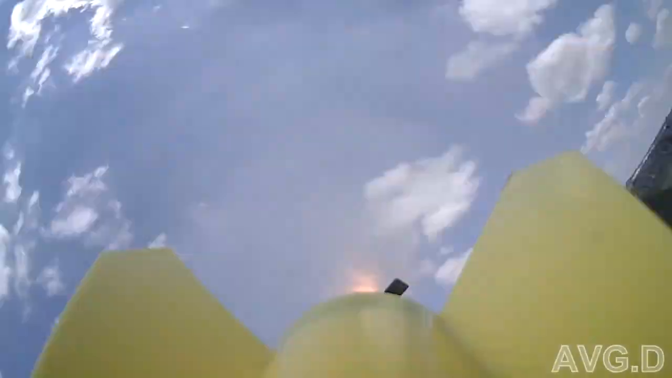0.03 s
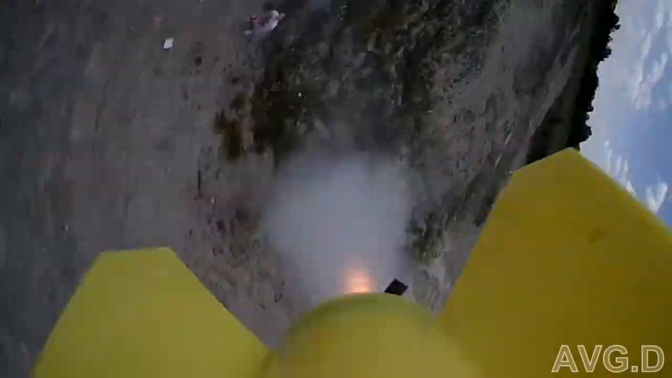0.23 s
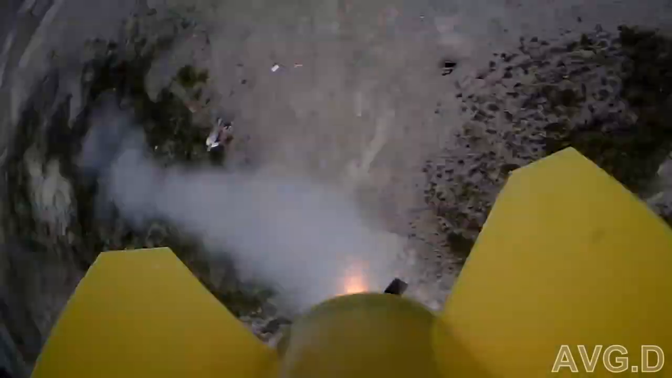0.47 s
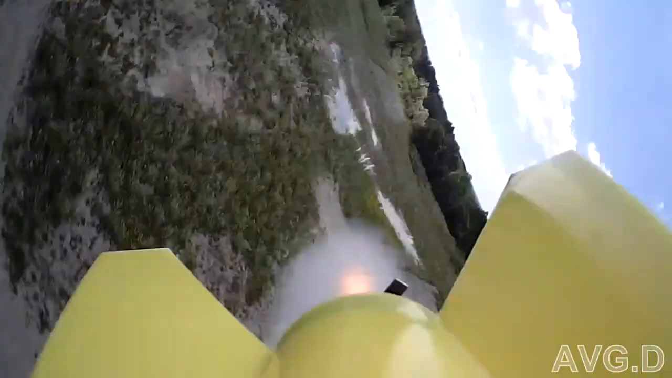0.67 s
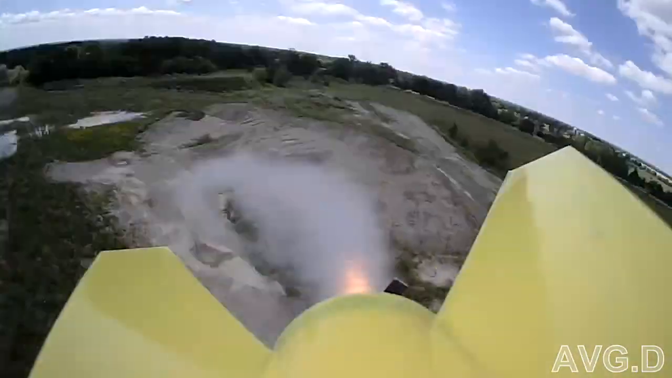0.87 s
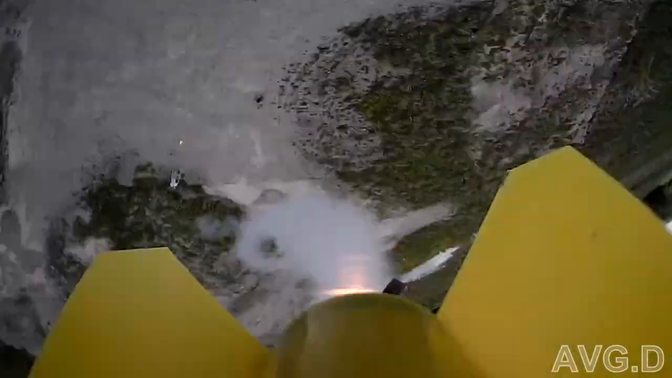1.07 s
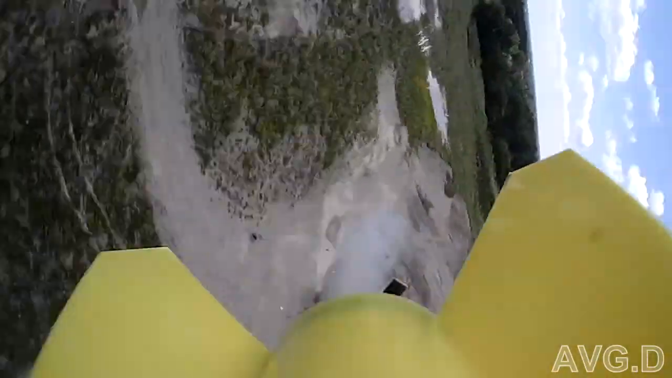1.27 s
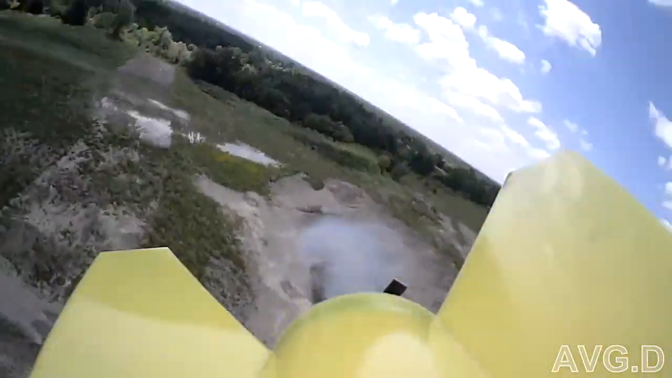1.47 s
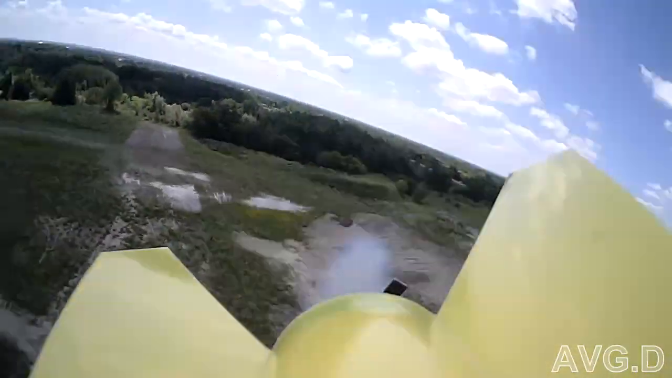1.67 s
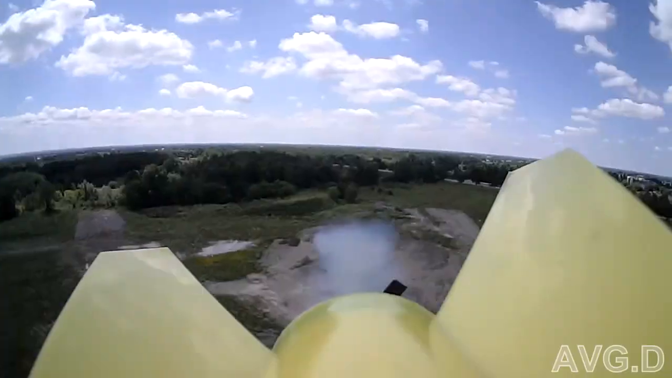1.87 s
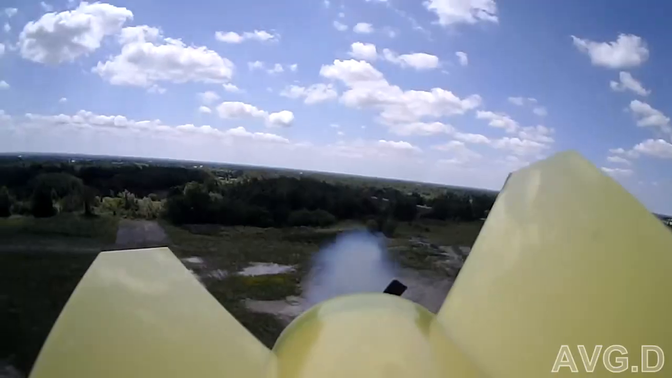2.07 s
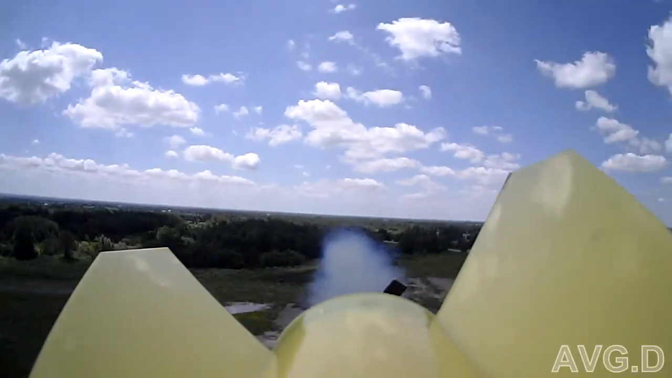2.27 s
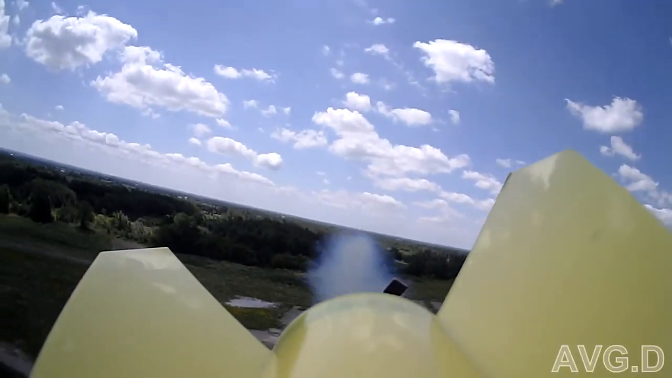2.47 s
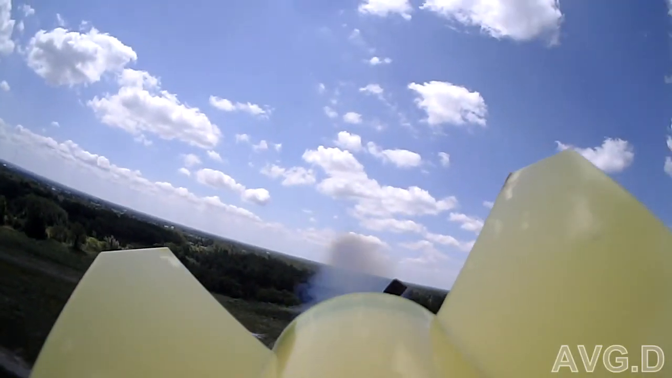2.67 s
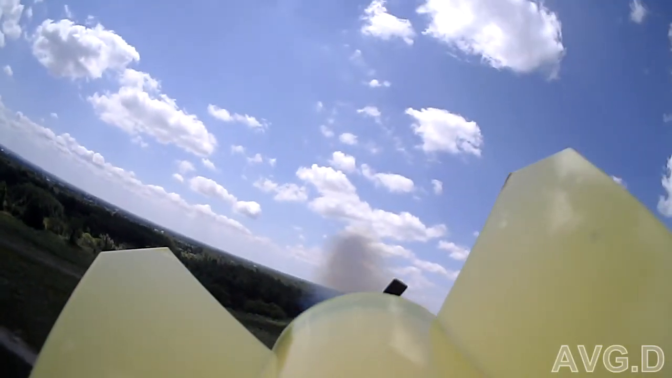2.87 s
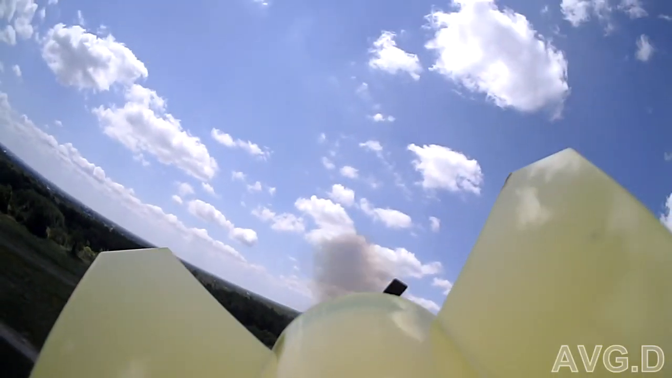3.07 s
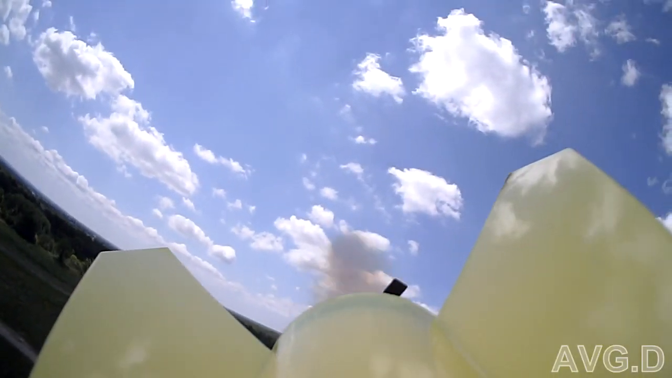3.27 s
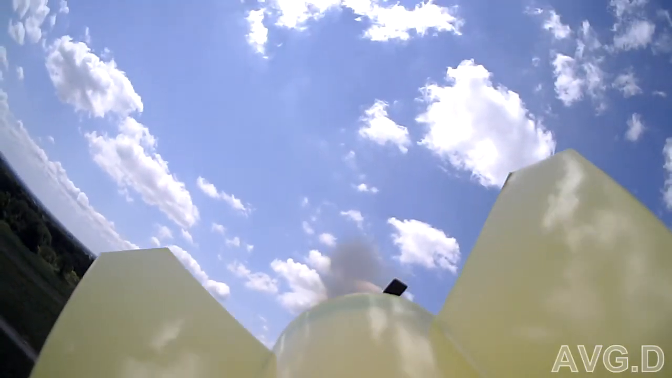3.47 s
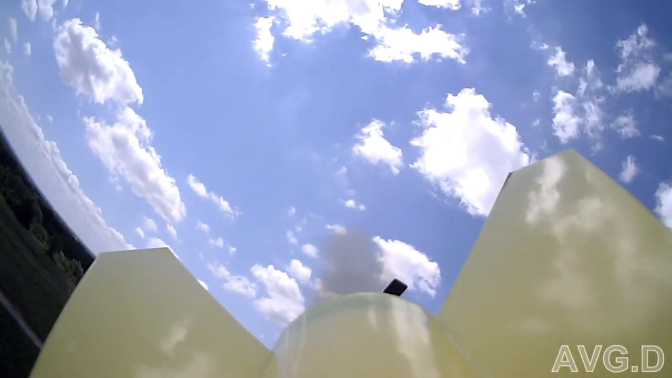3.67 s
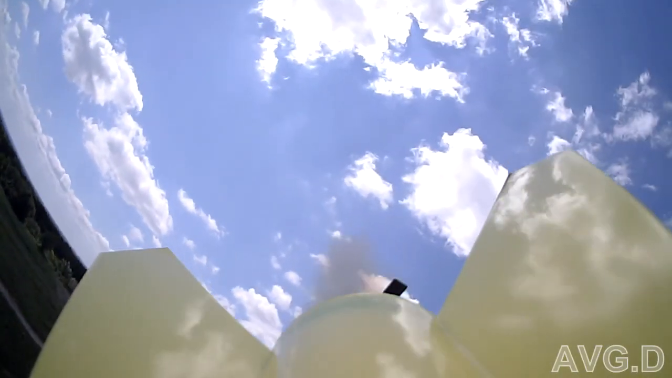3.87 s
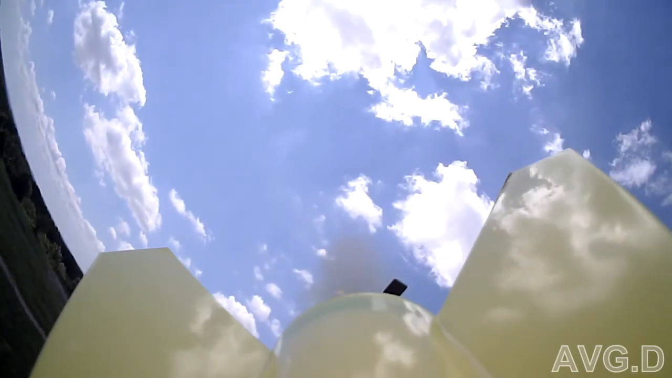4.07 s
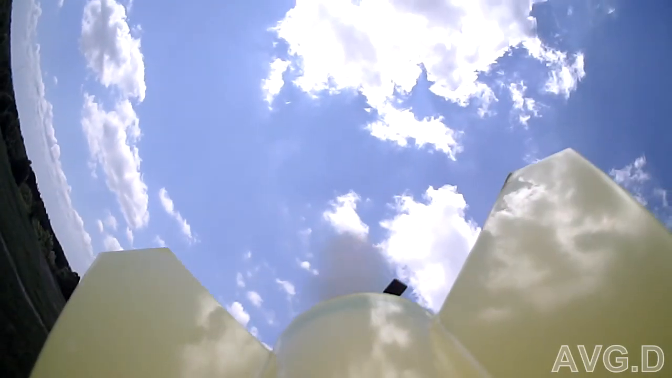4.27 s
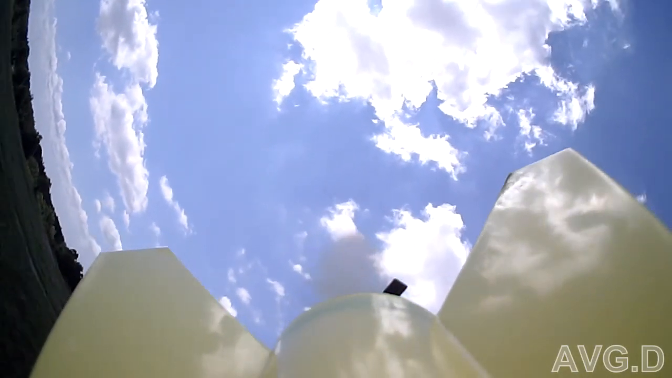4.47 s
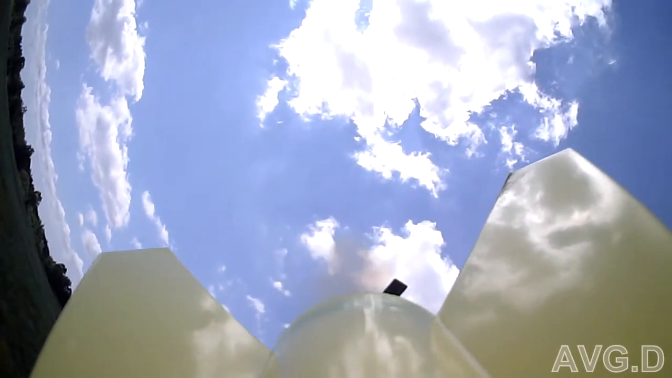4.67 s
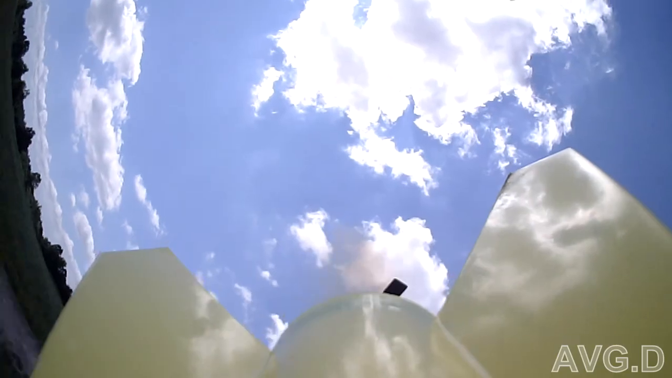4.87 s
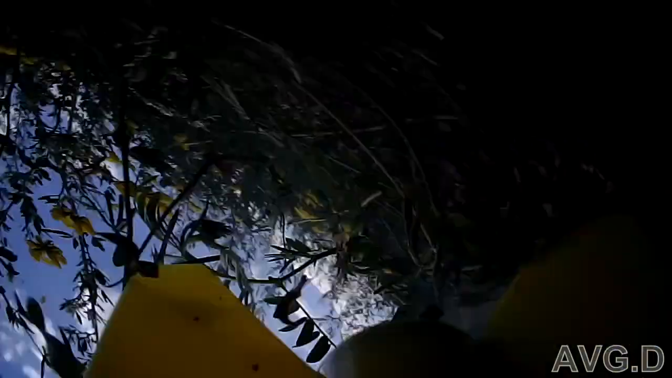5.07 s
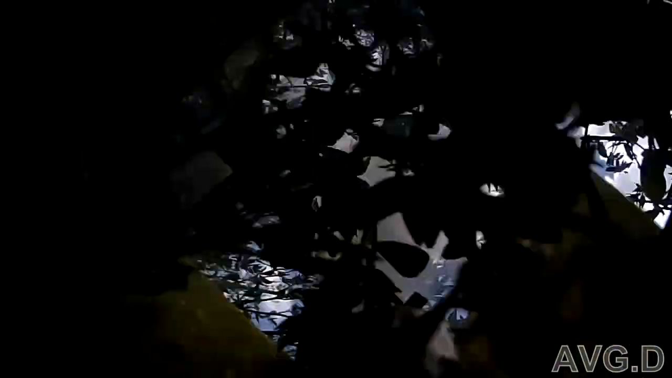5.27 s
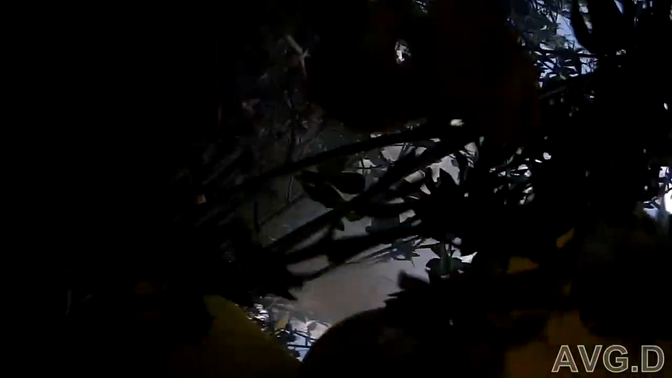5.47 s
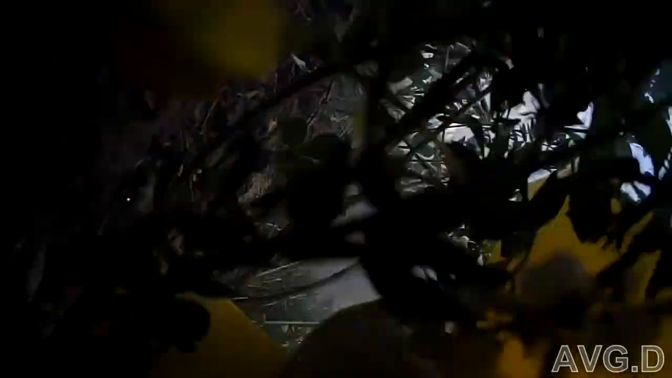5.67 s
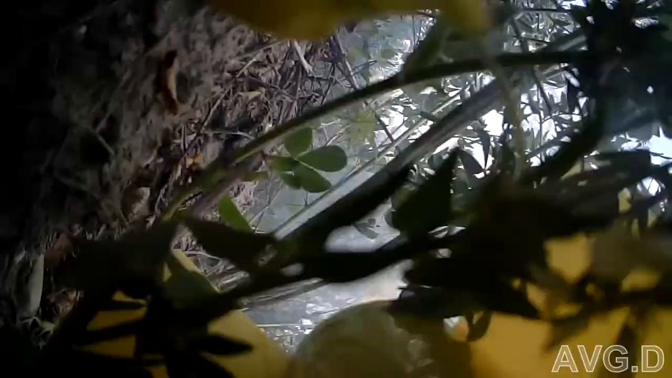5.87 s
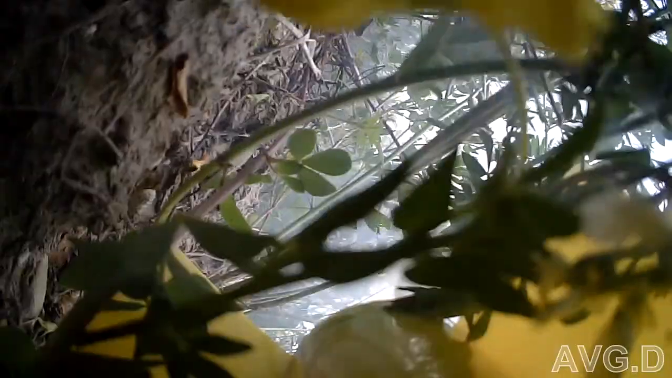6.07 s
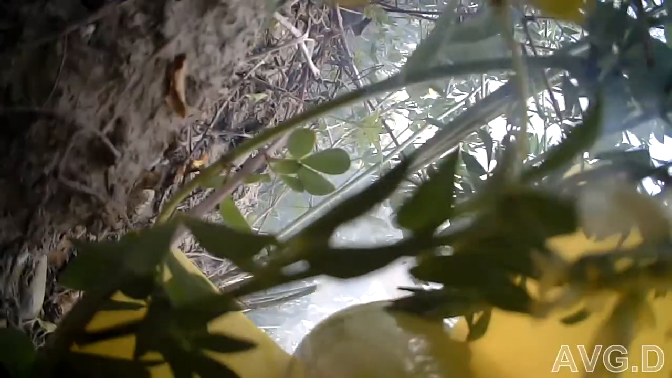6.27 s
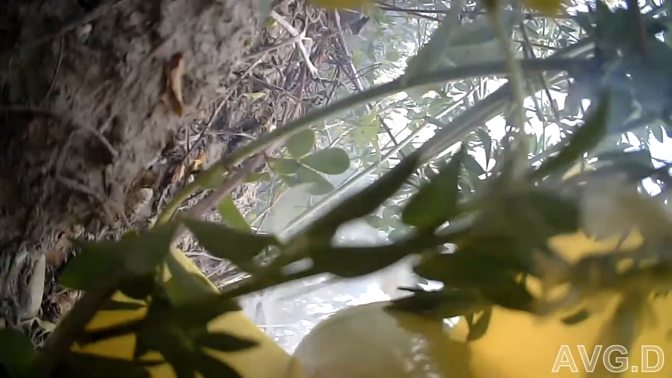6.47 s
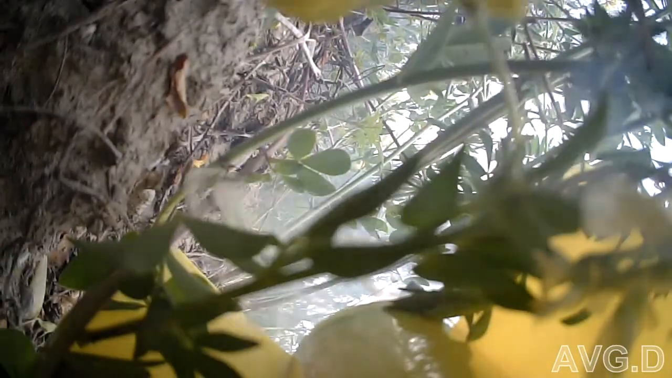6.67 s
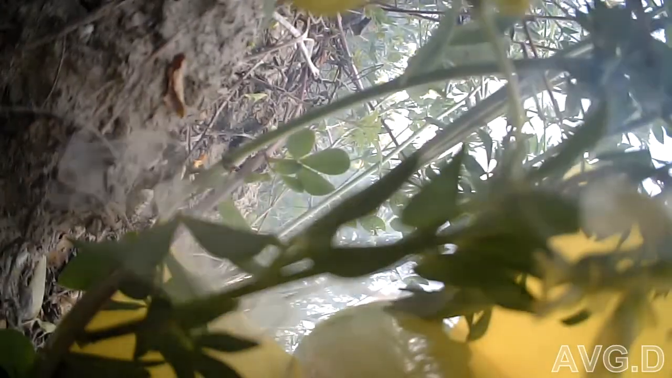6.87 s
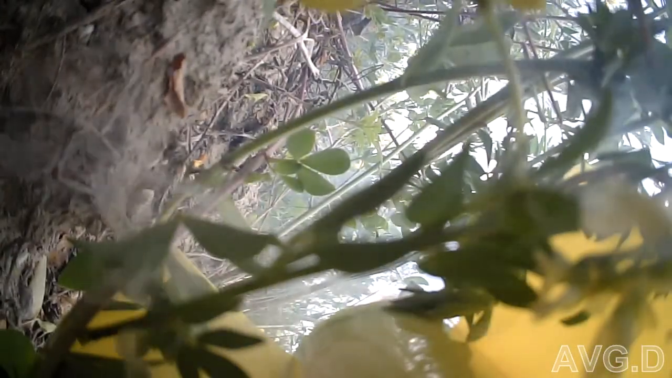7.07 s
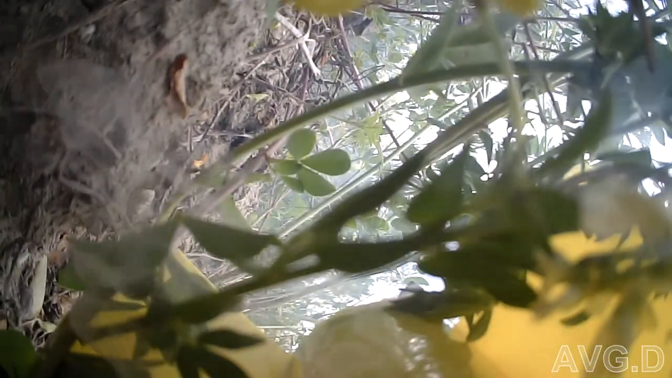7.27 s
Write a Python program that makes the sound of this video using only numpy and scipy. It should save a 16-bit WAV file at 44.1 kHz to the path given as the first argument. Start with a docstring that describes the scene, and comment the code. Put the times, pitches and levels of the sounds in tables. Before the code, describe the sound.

Heard from on board, a small rocket launches with a loud hiss, rushes through the air, crashes, sputters, pops and fizzles out.

```python
"""A quiet field, heard from a small camera taped to a model rocket. The motor hisses for a second while
eddies buffet the microphone, then air roars past as the rocket coasts. It crashes into weeds with a
double crack. The smoke charge sputters on, the ejection charge pops, and the spent motor fizzles out
through the body tube. The camera's case colours the sound and its microphone overloads."""
import sys
import numpy as np
from scipy.fft import rfft, irfft, next_fast_len
from scipy.io import wavfile
from scipy.ndimage import map_coordinates

SR = 44100
rng = np.random.default_rng(int(sys.argv[2]) if len(sys.argv) > 2 else 0)


def int16_out(signal):
    """Quantize to a 16-bit WAV file."""
    q = np.round(np.clip(np.atleast_2d(signal).T, -1, 1) * 32767)
    wavfile.write(sys.argv[1], SR, q.astype(np.int16))


N = 323253
BURNOUT_S, CRASH_S = 1.112, 5.0

# bright hiss of fast gas: frequency_hz, level_db
JET_SPECTRUM = [(60, -20.5), (250, -11), (600, -1.5), (1200, 0.5), (2300, -13.5), (3600, -1), (5500, -8.5),
                (9000, -5), (14300, -9), (15600, -20)]
# deep thumps on the microphone: frequency_hz, level_db
THUMP_SPECTRUM = [(15, 3.5), (35, -3), (80, -1.5), (130, -7), (300, -31), (1000, -77)]
# the hollow body when struck: frequency_hz, level_db
SHELL_SPECTRUM = [(60, -9.5), (500, 0), (1200, 3), (1700, -1.5), (2200, -1.5), (4000, -6), (7000, -13),
                  (15000, -29)]


def amp(db):
    """Decibels to gain."""
    return 10 ** (np.asarray(db) / 20)


def unit(x):
    """x at rms 1."""
    return x / np.sqrt(np.mean(x ** 2) + 1e-20)


def seconds():
    """The time of every sample."""
    return np.arange(N) / SR


def swell(peak_s, half_length_s):
    """A bell-shaped rise and fall."""
    return np.exp(-.5 * ((seconds() - peak_s) / half_length_s) ** 2)


def until(end_s, release_s):
    """Holds at 1, then dies away."""
    return np.exp(-np.maximum(seconds() - end_s, 0) / release_s)


def wobble(per_s):
    """A smooth random curve through per_s points a second."""
    return map_coordinates(rng.standard_normal(N // 8), [np.arange(N) * per_s / SR], mode="wrap")


def add(track, start_s, sound):
    """Mix a sound into the track."""
    start = round(start_s * SR)
    track[start:start + len(sound)] += sound[:N - start]


def along(spectrum, hz):
    """An EQ curve through (frequency_hz, level_db) points, joined on a log axis."""
    points_hz, db = np.transpose(spectrum)
    return amp(np.interp(np.log(hz + 1), np.log(points_hz + 1), db))


def filtered(x, response):
    """x shaped by a frequency response."""
    size = next_fast_len(x.shape[-1] + 8192)
    return irfft(rfft(x, size) * response(np.fft.rfftfreq(size, 1 / SR)), size)[..., :x.shape[-1]]


def resonance(hz, centre_hz, width_hz):
    """Response of one damped resonator."""
    return 1j * hz * width_hz / (centre_hz ** 2 - hz ** 2 + 1j * hz * width_hz)


def case(hz):
    """Standing waves in the camera case lift some bands and cancel others."""
    # peaks and notches: centre_hz, width_hz, gain_db
    bands = [(1730, 326, 6), (2900, 220, -2), (4150, 270, 2), (7010, 381, 7), (7765, 554, -8),
             (9200, 227, 0.5), (10940, 300, 2), (11752, 390, -3)]
    return amp(sum(db * np.exp(-.5 * ((hz - centre) / width) ** 2) for centre, width, db in bands))


def noise(response, size=N):
    """Coloured noise at rms 1."""
    return unit(filtered(rng.standard_normal(size), response))


def rush(spectrum, depth=1.0, size=N):
    """Noise of a given spectrum; depth is how strongly the case colours it."""
    return noise(lambda hz: along(spectrum, hz) * case(hz) ** depth, size)


def crackle(per_s, centre_hz, width_hz):
    """Random tiny snaps heard through the case, at rms 1."""
    snaps = (rng.random(N) < per_s / SR) * rng.standard_normal(N)
    return unit(filtered(snaps, lambda hz: resonance(hz, centre_hz, width_hz) ** 2 * case(hz)))


def field():
    """The bed: a soft, uneven breeze in the weeds over the microphone's own hiss."""
    # dark rustle of the breeze: frequency_hz, level_db
    breeze_spectrum = [(25, 4), (80, 5.5), (200, -2.5), (350, -3.5), (490, -1), (700, -3), (950, -12.5),
                       (1450, -7.5), (2200, -20.5), (4000, -23.5), (8000, -38)]
    # microphone self-noise: frequency_hz, level_db
    hiss_spectrum = [(100, 12), (3000, -3), (7000, -6), (13500, -10.5), (15600, -12)]
    breeze = amp(-52 + .9 * wobble(29) + 1.2 * wobble(8.1)) * noise(lambda hz: along(breeze_spectrum, hz))
    return breeze + amp(-54.5) * noise(lambda hz: along(hiss_spectrum, hz))


def motor():
    """The exhaust jet: a bright hiss that flickers as the propellant burns and collapses at burnout."""
    thrust = amp(-10) * until(BURNOUT_S, release_s=0.033)
    afterburn = amp(-22.5) * until(BURNOUT_S, release_s=.3)
    flicker = amp(1.2 * wobble(150))
    return np.hypot(thrust, afterburn) * flicker * rush(JET_SPECTRUM, depth=1.6)


def buffeting():
    """Eddies thump and flap on the microphone: a steady wake under thrust, plus single hits."""
    # single eddies: peak_s, half_length_s, thump_db, flap_db
    eddies = [(.015, 0.019, -8.5, -17), (.08, 0.015, -19, -23), (0.518, 0.024, -27.5, -11),
              (0.596, 0.038, -30, -17.5), (0.698, 0.029, -13.5, -10.5), (0.847, 0.024, -25, -8.5),
              (1.05, 0.043, -28.5, -11), (1.69, 0.068, -30.5, -43), (2.154, .06, -27, -43)]
    # low-mid flapping of the air: frequency_hz, level_db
    flap_spectrum = [(30, -30), (90, -10), (160, -3), (330, -4), (800, -12.5), (3000, -60)]
    wake = until(BURNOUT_S, release_s=.2)
    thump = amp(-38.5) * wake + sum(amp(db) * swell(s, half) for s, half, db, _ in eddies)
    flap = amp(-30) * wake + sum(amp(db) * swell(s, half) for s, half, _, db in eddies)
    return thump * rush(THUMP_SPECTRUM) + flap * amp(2.2 * wobble(40)) * rush(flap_spectrum)


def airspeed():
    """Speed along the ballistic arc, relative to its slowest point at the top."""
    apex_s, apex_m_per_s, gravity_m_per_s2 = 3.09, 16.7, 9.81
    fall_m_per_s = gravity_m_per_s2 * (np.maximum(seconds(), BURNOUT_S) - apex_s)
    return np.hypot(1, fall_m_per_s / apex_m_per_s)


def airflow():
    """Air roars over the case, hisses past the fins and blows across the microphone port."""
    # turbulent roar: frequency_hz, level_db
    air_spectrum = [(40, -11.5), (110, -2), (250, -3.5), (600, -1), (1100, 1), (1900, -9), (2500, -13.5),
                    (4500, -16.5), (7000, -23.5), (9000, -30.5), (15600, -65.5)]
    # the rocket swerves and meets the air sideways: peak_s, half_length_s, roar_db, port_ring_db
    swerves = [(.46, .03, -12.5, -23.5), (0.803, 0.027, -13.5, -24.5), (0.878, .022, -6.5, -17.5),
               (0.957, 0.04, -18.5, -5.5), (1.096, 0.053, -6.5, -18), (1.202, .012, -19.5, -9),
               (1.51, 0.056, -11.5, -16), (1.897, 0.053, -14, -20), (2.298, 0.066, -20.5, -24)]
    pickup_s, sideways_cutoff_hz = 1, 4700
    speed = airspeed()
    lull = amp(-3 * swell(1.27, 0.051))  # the roar eases just after burnout
    flow = np.minimum(seconds() / pickup_s, 1) * lull
    gusts = sum(amp(db) * swell(s, half) for s, half, db, _ in swerves)
    ring = sum(amp(db) * swell(s, half) for s, half, _, db in swerves)
    flutter = amp(.2 * wobble(50) + 0.46 * wobble(350))
    roar = amp(-16) * speed ** 1.3 * flow * rush(air_spectrum)
    port_tone = noise(lambda hz: resonance(hz, centre_hz=1400, width_hz=400) ** 2)
    port = np.hypot(amp(-34.5) * speed ** 5 * flow, ring) * port_tone
    dull_roar = noise(
        lambda hz: along(air_spectrum, hz) * case(hz) / np.hypot(1, (hz / sideways_cutoff_hz) ** 2))
    fins = amp(-43.5) * speed ** 1.8 * rush(JET_SPECTRUM, depth=0.89)
    return (flutter * (roar + port + gusts * dull_roar) + fins) * until(CRASH_S, release_s=0.028)


def spits_and_rustle():
    """Short bursts of noise: gas spits and whistles, then a soft rustle after the pop."""
    # gas spits and whistles, last the rustle: peak_s, half_length_s, pitch_hz, nominal_width_hz, level_db
    bursts = [(0.957, 0.039, 3460, 3020, -10), (1.193, 0.02, 3530, 3000, -13.5),
              (5.169, 0.017, 2230, 250, -34), (5.175, .033, 3750, 1100, -34.5),
              (5.315, 0.021, 2280, 300, -27.5), (5.59, 0.015, 10470, 3000, -22.5),
              (5.674, 0.019, 5000, 1505, -29), (5.794, 0.035, 1400, 1500, -41.5)]
    track, t = np.zeros(N), np.arange(-SR // 5, SR // 5) / SR
    for peak_s, half_length_s, pitch_hz, width_hz, db in bursts:
        band = noise(lambda hz: resonance(hz, pitch_hz, 0.92 * width_hz) ** 2 * case(hz), size=len(t))
        add(track, peak_s + t[0], amp(db) * np.exp(-.5 * (t / half_length_s) ** 2) * band)
    return track


def blows():
    """Each blow shakes the hollow body with a dense crack and a low thump; the crash booms on briefly."""
    # two ground hits, then the ejection pop: start_s, level_db, rise_s, t60_s, thump_db, tilt_db_per_octave
    hits = [(4.967, 10.5, .00056, 0.035, -16.5, 2.5), (4.999, 15.5, 0.00058, 0.059, -22.5, 0.5),
            (5.5989, 8.5, 0.0027, 0.053, -22.5, -0.4)]
    # the crash's booming tail, then the body rocking to rest: peak_s, half_length_s, level_db
    low_thumps = [(5.023, .026, -22), (5.195, 0.016, -43), (5.322, 0.026, -36)]
    track, t = np.zeros(N), np.arange(SR // 4) / SR
    for start_s, db, rise_s, t60_s, thump_db, tilt_db in hits:
        crack = noise(lambda hz: along(SHELL_SPECTRUM, hz) * case(hz)
                      * amp(tilt_db * np.log2(hz / 2000 + .1)), size=len(t))
        crack *= amp(-60 * t / t60_s) * (1 - np.exp(-t / rise_s))
        thump = noise(lambda hz: resonance(hz, centre_hz=105, width_hz=140) ** 2, size=len(t))
        thump *= amp(thump_db - 60 * t / 0.13) * (1 - np.exp(-t / 0.002))
        add(track, start_s, amp(db) * (crack + thump))
    low_swells = sum(amp(db) * swell(s, half) for s, half, db in low_thumps)
    return track + low_swells * rush(THUMP_SPECTRUM)


def smoke_charge():
    """The slow charge hisses on the ground, spitting sparks, louder and fuller as it burns through."""
    # hiss of the burning charge: frequency_hz, level_db
    smoke_spectrum = [(60, -21), (250, -7.5), (450, -7), (1200, 0.5), (1900, -7), (2280, -4.5),
                      (2650, -13.5), (3400, -6.5), (5100, -9), (5900, -15), (7100, -10.5), (9300, -19.5),
                      (10500, -14), (14300, -20.5), (15600, -25.5)]
    spent_s, swell_db_per_s = 5.665, 18
    body_cutoff_hz, body_growth_db_per_s = 1900, 10
    age = np.clip(seconds(), CRASH_S, spent_s) - CRASH_S
    level = (age > 0) * amp(-33 + swell_db_per_s * age) * until(spent_s, release_s=0.014)
    gas = rush(smoke_spectrum)
    body = filtered(gas, lambda hz: 1 / (1 + (hz / body_cutoff_hz) ** 6))
    hiss = gas - body + amp(-4 + body_growth_db_per_s * age) * body
    sputter = amp(0.74 * wobble(45) + 1.2 * wobble(460))
    sparks = amp(-16.5) * crackle(per_s=56, centre_hz=2800, width_hz=3800)
    return level * (sputter * hiss + sparks)


def ticks():
    """Stalks and grit flick the settling body: a broad click and a short pitched ring."""
    # small contacts: start_s, relative_level_db, pitch_hz, width_hz
    flicks = [(5.0205, -3, 4000, 6000), (5.0324, 2, 1610, 1500), (5.0445, -6, 2100, 2000),
              (5.054, -0.5, 1800, 1000), (5.0914, -15.5, 3000, 3480), (5.1118, -27.5, 3000, 3500),
              (5.1387, -17, 1600, 1500), (5.192, -13.5, 300, 398), (5.194, -13.5, 1900, 2500),
              (5.2683, -8, 2590, 2020), (5.3552, -11, 2500, 3500), (5.3926, -14.5, 2000, 1500),
              (5.593, 0, 1450, 1800), (5.622, -7.5, 1700, 3020), (5.773, -25.5, 1600, 1200),
              (5.7947, -25.5, 1690, 2000), (5.8044, -25.5, 2190, 1990), (5.8975, -32.5, 5600, 6000),
              (5.915, -24, 2720, 500), (5.9454, -39.5, 6500, 3000), (6.0994, -40, 4500, 5000),
              (6.7186, -37, 3800, 1400)]
    trim_db, click_db, t60_s = -21.5, -5.5, 0.021
    track, t = np.zeros(N), np.arange(SR // 16) / SR
    for start_s, db, pitch_hz, width_hz in flicks:
        ring = noise(lambda hz: resonance(hz, pitch_hz, width_hz) ** 2, size=len(t))
        click = amp(click_db) * rush(SHELL_SPECTRUM, size=len(t))
        add(track, start_s, amp(db + trim_db) * unit((ring + click) * amp(-60 * t / t60_s)))
    return track


def fizzle():
    """The last gas hisses through the open tube; its upper resonances fade first as the flow weakens."""
    # air column of the empty body tube: pitch_hz, nominal_width_hz, level_db
    tube_modes = [(530, 520, -0.5), (1720, 380, -3.5), (2205, 200, -13), (3680, 600, -11.5),
                  (5300, 700, -20), (7000, 400, -19), (9260, 500, -26)]
    start_s, rise_s, fade_db_per_s = 5.66, 0.039, 18
    bright_hz, dull_hz, dulling_s = 9200, 1300, 0.38
    age = np.maximum(seconds() - start_s, 0)
    flow = (1 - np.exp(-age / rise_s)) * amp(-38 - fade_db_per_s * age)
    cutoff_hz = dull_hz + (bright_hz - dull_hz) * np.exp(-age / dulling_s)
    tube = np.zeros(N)
    for pitch_hz, width_hz, db in tube_modes:
        mode = noise(lambda hz: resonance(hz, pitch_hz, 1.9 * width_hz) ** 3)
        tube += amp(db) * mode / np.sqrt(1 + (pitch_hz / cutoff_hz) ** 4)
    sputter = amp(.66 * wobble(45) + 1.1 * wobble(520))
    return flow * sputter * tube


def stalks():
    """Bent stalks crackle as they creep back after the pop."""
    return amp(-48) * swell(5.83, .05) * crackle(per_s=190, centre_hz=1800, width_hz=1300)


def scene():
    """Flight, crash and fizzle over the field; one microphone feeds both channels."""
    flight = motor() + airflow() + buffeting()
    mono = flight + blows() + ticks() + smoke_charge() + spits_and_rustle() + stalks() + fizzle() + field()
    return np.array([mono, mono])


def record(dry):
    """The camera saturates at full scale and keeps nothing above its band limit."""
    hardness, rolloff_hz, limit_hz = 10, 15350, 15740
    clipped = dry / (1 + np.abs(dry) ** hardness) ** (1 / hardness)
    return filtered(clipped, lambda hz: (hz < limit_hz) / np.sqrt(1 + (hz / rolloff_hz) ** 60))


dry = scene()
out = record(dry)
int16_out(out)
```